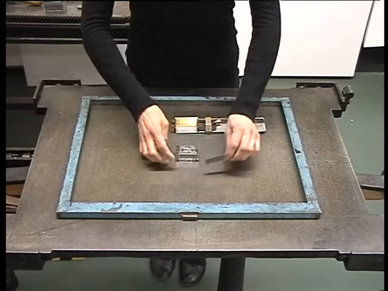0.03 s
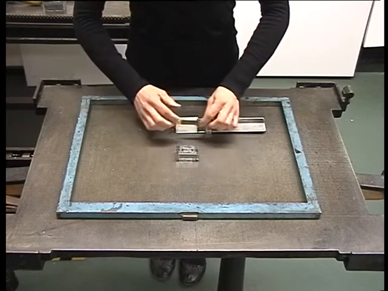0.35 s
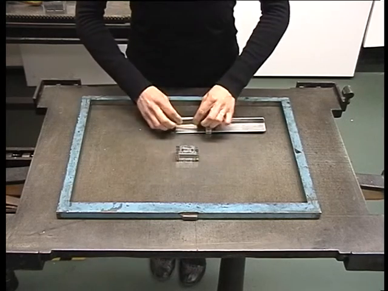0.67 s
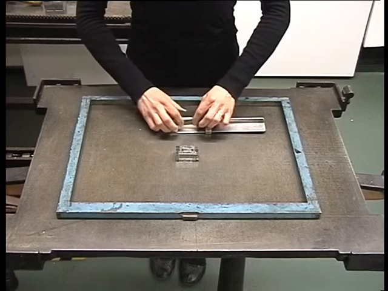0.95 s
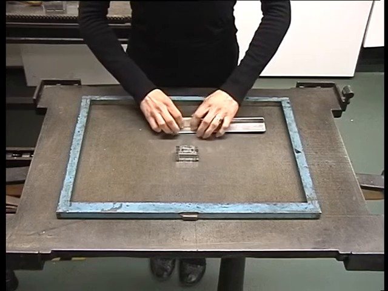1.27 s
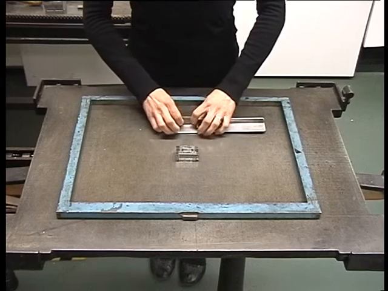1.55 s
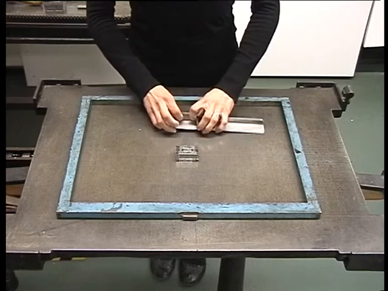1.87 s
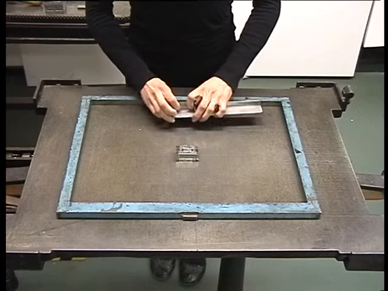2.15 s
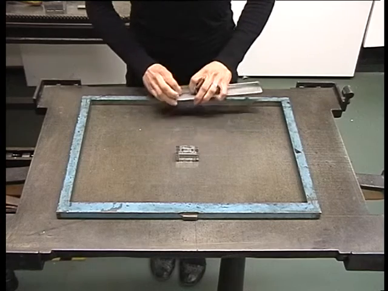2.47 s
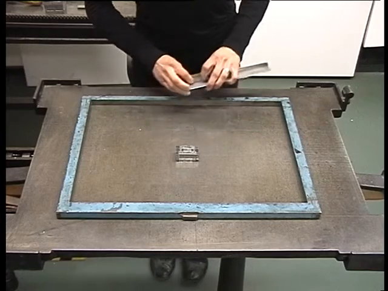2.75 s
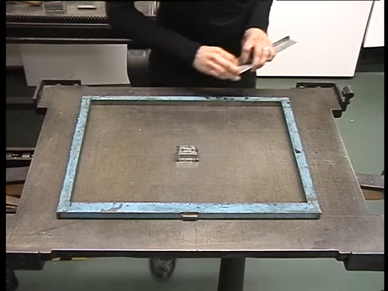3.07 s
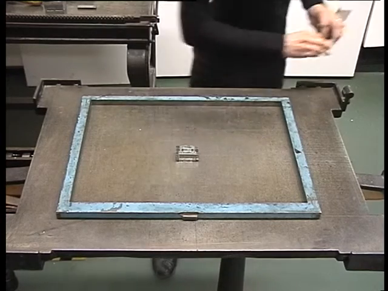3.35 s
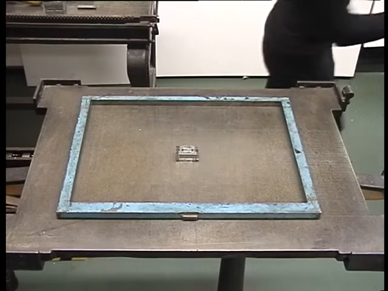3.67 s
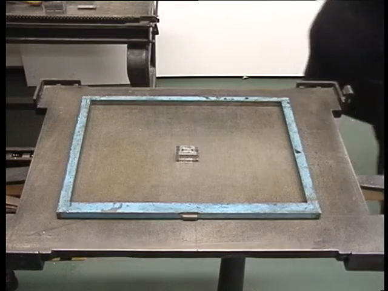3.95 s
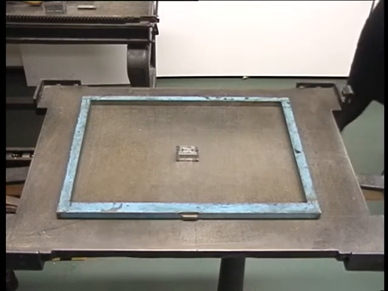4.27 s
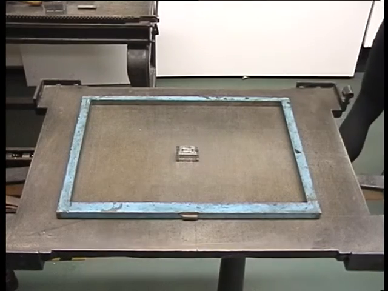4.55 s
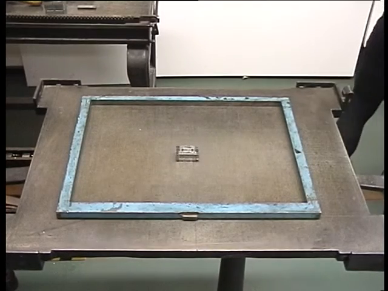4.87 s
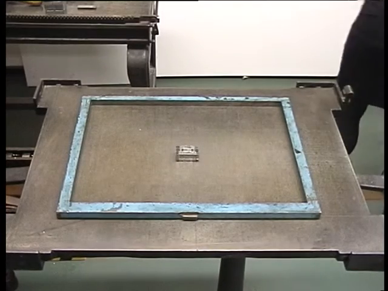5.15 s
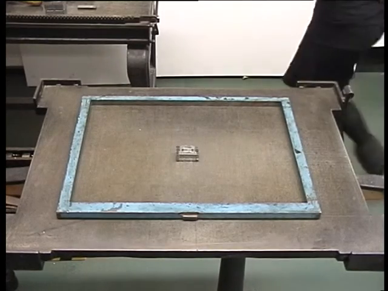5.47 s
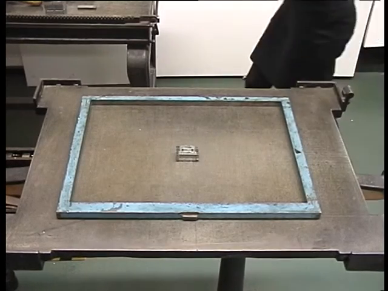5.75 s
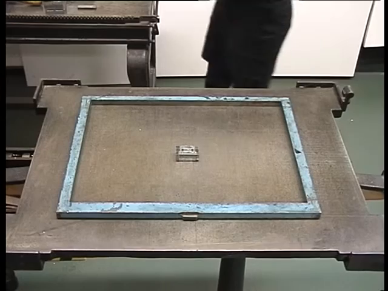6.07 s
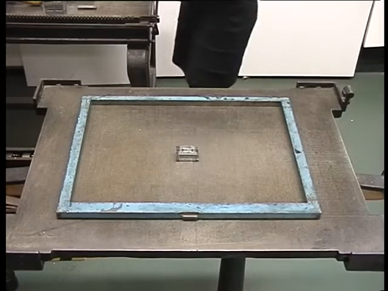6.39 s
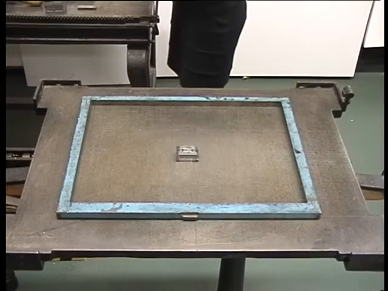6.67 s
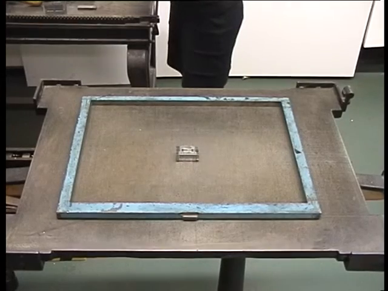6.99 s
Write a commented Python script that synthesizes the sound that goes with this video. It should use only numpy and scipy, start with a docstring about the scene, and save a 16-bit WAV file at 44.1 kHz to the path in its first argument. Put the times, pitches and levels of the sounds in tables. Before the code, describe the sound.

Light metallic ticks sound near the microphone, then a sharp, ringing snap with a low thump and a brief gritty scrape as type seats in its holder. Someone walks away quietly, clothes rustling. A louder cluster comes from the right: a tool clacking down, two wooden knocks, a small bouncing clink. Soft steps come back. The workshop's hard walls add a short echo, with faint hiss and hum throughout.

```python
"""Small, bright ticks of metal type against a steel composing stick, close up in a hard-walled workshop.
The clamp snaps shut with a low thump and the type grates home. The printer walks off, clothes swishing;
to the right a tool clacks down, a wooden case is bumped twice and a small piece drops. The steps
return. Each hit is a burst of micro-impacts ringing a resonant body; air and mains hum lie underneath."""
import sys
import numpy as np
from scipy import signal
from scipy.fft import rfft, irfft, next_fast_len
from scipy.io import wavfile
from scipy.ndimage import uniform_filter1d

SR = 44100
rng = np.random.default_rng(int(sys.argv[2]) if len(sys.argv) > 2 else 0)


def store_wav(level_fs):
    """Save 16-bit WAV to argv[1]."""
    pcm = np.round(np.clip(np.atleast_2d(level_fs), -1, 1) * 32767)
    wavfile.write(sys.argv[1], SR, pcm.T.astype(np.int16))


N = 318709

# Cues. A hit's level is its drive into the body, rattle its decay time, treble its high-shelf gain.
# type ticks on the stick: t/s, level/dB, rattle/s, treble/dB, ring/Hz, overtone/Hz
TICK_HITS = [(0.573, -43.5, 0.004, -2, 2960, 5140), (0.7265, -45, 0.003, -2.5, 3410, 4250),
             (0.82, -63, 0.003, 3, 3430, 5140), (1.021, -51, 0.03, -3, 2980, 3100),
             (1.052, -40, 0.0049, 3.5, 3520, 4250), (1.445, -44, 0.004, 1, 4400, 5100),
             (2.022, -60.5, 0.0053, -0.5, 3000, 4200)]
# single touches: t/s, level/dB, rattle/s, treble/dB
CLAMP_HITS = [(1.0602, -16.5, 0.0015, -0.5)]  # the clamp shuts
TYPE_HITS = [(1.4216, -30, 0.0022, -5), (1.4446, -40, 0.00097, -0.5), (2.17, -60.5, 0.028, 1),
             (2.68, -49.5, 0.016, -15)]  # the type butts home and shifts
TINKLE_HITS = [(5.0015, -35, 0.0094, 0), (5.018, -44, 0.0086, -3)]  # the small piece slides
CLINK_HITS = [(5.0506, -31.5, 0.0034, 2.5), (5.059, -26, 0.0026, 0.5), (5.065, -33, 0.0026, 0.5)]  # it lands and bounces
SHOE_DRAGS = [(3.47, -56, 0.24, 4), (3.925, -68, 0.18, 12), (6.73, -56.5, 0.039, -10)]
# blows that rebound: t/s, level/dB, rattle/s, treble/dB, first gap/s
CARRY_HITS = [(3.185, -45.5, 0.0037, -3, 0.008)]
TOOL_HITS = [(4.2516, -23.5, 0.0041, 1, 0.004)]
CASE_HITS = [(4.5235, -22, 0.006, -0.5, 0.017), (4.651, -26.5, 0.013, 4, 0.013)]
# footsteps: t/s, heel level/dB, sole level/dB, treble/dB
FOOTSTEPS = [(3.25, -58, -57.5, -6.5), (3.83, -55.5, -74, -17), (5.848, -47.5, -56, -2.5),
             (6.41, -56, -71, -21)]
# sub-bass thumps: t/s, level/dB
LOW_THUMPS = [(1.0602, -41), (1.126, -52), (4.252, -54)]
# cloth strokes: peak t/s, level/dB, rise/s, fall/s
STRIDE_SWISHES = [(3.3, -60, .008, 0.015), (3.845, -51, 0.013, 0.046), (3.922, -50.5, 0.047, 0.053),
                  (5.65, -62.5, 0.11, 0.075), (5.99, -64, 0.067, 0.023), (6.08, -61, 0.028, .03),
                  (6.395, -57, 0.01, 0.054)]
LONG_RUSTLE = [(3.7, -67.5, 0.66, 2.2)]

# broad tone of each source: f/Hz, level/dB
TICK_EQ = [(100, -14), (700, -21), (1500, -3.5), (2200, -9.5), (3000, 6.5), (4000, 0), (5500, -6),
           (7200, -10), (9500, -20), (16000, -33)]
STICK_EQ = [(100, -60), (500, -24.5), (1100, -20), (1500, -9), (2350, -12), (3100, 4), (3950, -3),
            (5200, 0.5), (7300, 2), (9500, -5.5), (14000, -6.5), (16000, -13)]
TYPE_EQ = [(100, -38), (500, -10.5), (900, -15), (2000, -3.5), (3200, 2), (7000, 3), (9500, -2.5),
           (12000, -3), (16000, -19)]
CARRY_EQ = [(150, -15), (380, -5), (520, 7.5), (850, -4.5), (1300, 2), (2800, -4.5), (3500, -10),
            (6200, -13), (7300, 0.5), (8400, -10), (10000, -17), (16000, -32)]
TOOL_EQ = [(100, -33), (230, -15.5), (380, -3), (620, -11), (1050, 0.5), (1700, -1.5), (3100, 1), (4900, 2),
           (7500, 1.5), (10000, -5), (12300, -8), (15500, -25)]
CASE_EQ = [(60, -33), (120, -21.5), (200, -12.5), (370, -3.5), (600, -4.5), (830, -8), (1050, -5),
           (2000, -13.5), (3100, -11.5), (5000, -16.5), (8200, -17), (9200, -26), (12000, -29),
           (15500, -49)]
TINKLE_EQ = [(300, -11), (2400, -7.5), (3000, 1), (4000, 3), (8500, -3), (11000, 0), (15000, -6),
             (16000, -18)]
CLINK_EQ = [(100, -27), (270, 1.5), (430, 8), (750, -3.5), (2100, -8), (2900, 5), (3700, 0), (4800, -5),
            (7800, -5), (8900, -2), (11000, -12.5), (15500, -20)]
STEP_EQ = [(70, -36), (170, 0), (290, 6), (450, -1.5), (800, 2), (1280, 2.5), (2000, -3), (3500, -16),
           (8000, -32), (16000, -43)]
CLOTH_EQ = [(150, -16), (900, -0.5), (2000, 0.5), (3500, -0.5), (6000, 1.5), (8000, 0), (11000, -3.5),
            (15500, -6.5)]
AIR_EQ = [(26, -28), (45, -13.5), (96, -6), (139, -3.5), (290, -5.5), (353, -6), (833, -4.5), (1040, -4),
          (1300, -8), (2770, -6.5), (3900, -10.5), (4640, -10.5), (5110, -13.5), (15800, -17.5)]
# resonances of each body: f/Hz, width/Hz, level above its EQ/dB
STICK_RINGS = [(1470, 70, 7), (3050, 120, 2), (3284, 60, 9), (4235, 35, 9), (4317, 30, 19), (5276, 25, 5),
               (6363, 25, 4), (7510, 30, 7), (8549, 30, 6), (11400, 40, 5), (13630, 60, 6)]
TYPE_RINGS = [(1985, 50, 10), (3200, 150, 3)]
WALL_RING = [(2000, 60, 14)]  # the stick's wall, rubbed by slipping type
TOOL_RINGS = [(1120, 60, 5), (2110, 80, 5), (2730, 70, 8), (3550, 110, 1), (5050, 130, 5), (5600, 60, 4),
              (6510, 60, 3), (8400, 60, 4), (10200, 70, 4), (11800, 90, 6)]
CASE_RINGS = [(271, 20, 6), (357, 26, 5), (407, 20, 5), (527, 28, 8), (653, 30, 8), (702, 20, 6),
              (1620, 90, 3)]
TINKLE_RINGS = [(3030, 90, 7.3), (4700, 45, 6), (5370, 46, 13), (7400, 82, 14), (8560, 58, 18)]
CLINK_RINGS = [(2843, 110, 5), (3270, 90, 5)]

# the workshop's reverb time: f/Hz, T60/s
REVERB_TIME = [(100, 0.98), (400, 0.98), (1200, 0.98), (3000, 0.83), (7000, 0.6), (12000, 0.31),
               (16000, 0.24)]
# stereo image: f/Hz, left-right correlation (0 wide, 1 mono)
REVERB_IMAGE = [(100, 0.98), (400, 1), (1000, 0.84), (2000, 0.53), (4000, 0.032), (12000, 0.059)]
AIR_IMAGE = [(50, 0.1), (400, 0.54), (1500, 0.2), (5000, 0.043), (15000, 0.082)]
# mains hum and whine: f/Hz, level before the trim/dB
HUM_PARTIALS = [(49, -72), (150, -72), (300, -73), (600, -77), (1050, -74), (2400, -75.5), (2700, -75.5),
                (3000, -78.5), (3600, -85), (4200, -78), (4500, -72), (4800, -75)]


def clamp_snap():
    """The clamp shuts in one hard, tight hit that rings the steel stick."""
    return body(contacts(CLAMP_HITS, grain_db=1.5), STICK_EQ, STICK_RINGS)


def type_ticks(width_hz=70, ring_db=8, overtone_db=12.5):
    """Each piece of type taps the stick and rings briefly at its own pitch, with one overtone."""
    out = 0
    for *touch, ring_hz, overtone_hz in TICK_HITS:
        rings = [(ring_hz, width_hz, ring_db), (overtone_hz, width_hz, overtone_db)]
        out += body(contacts([touch], grain_db=2.0), TICK_EQ, rings)
    return out


def type_grate(start_s=1.379, gap_s=0.0075, count=5, swell_s=0.018, swell_db=8):
    """Type sticks and slips along the wall at even gaps; the push builds, then holds."""
    full_db, rattle_s, treble_db = -36, 0.012, -4
    ages = gap_s * np.arange(count)
    levels = full_db - swell_db * np.maximum(1 - ages / swell_s, 0)
    slips = [(start_s + age, db, rattle_s, treble_db) for age, db in zip(ages, levels)]
    return body(contacts(slips, grain_db=4.0), TYPE_EQ, TYPE_RINGS + WALL_RING)


def type_seating():
    """The type butts home with a gritty click, then shifts faintly in the stick."""
    return body(contacts(TYPE_HITS, grain_db=5.0), TYPE_EQ, TYPE_RINGS)


def stick_carry():
    """The stick knocks lightly as it is carried off, each rebound brighter."""
    hits = rebounds(CARRY_HITS, gap_ratio=1.1, loss_db=3.5, treble_step_db=5.0)
    return body(contacts(hits, grain_db=2.5), CARRY_EQ)


def tool_clack(settle_after_s=0.0134, settle_db=-18, settle_rattle_s=0.0022, settle_treble_db=-6):
    """A metal tool chatters as it lands, then its weight settles with a duller knock."""
    chatter = rebounds(TOOL_HITS, gap_ratio=0.9, loss_db=0.1, treble_step_db=-1.2)
    settle = (TOOL_HITS[0][0] + settle_after_s, settle_db, settle_rattle_s, settle_treble_db)
    return body(contacts(chatter + [settle], grain_db=2.5), TOOL_EQ, TOOL_RINGS)


def case_bumps(graze_softer_db=11.5, graze_lead=0.8):
    """A wooden case is grazed, bumped and left rocking; the slower the bump, the earlier the graze."""
    grazes = [(s - graze_lead * rattle_s, db - graze_softer_db, rattle_s, treble_db)
              for s, db, rattle_s, treble_db, _ in CASE_HITS]
    rocking = rebounds(CASE_HITS, gap_ratio=1.9, loss_db=0.8, treble_step_db=-12)
    return body(contacts(grazes + rocking, grain_db=4.5), CASE_EQ, CASE_RINGS)


def piece_slide():
    """A small metal piece tinkles as it slides, just before it drops."""
    return body(contacts(TINKLE_HITS, grain_db=1), TINKLE_EQ, TINKLE_RINGS)


def piece_drop():
    """The piece lands and bounces in a quick cluster of clinks."""
    return body(contacts(CLINK_HITS, grain_db=0.5), CLINK_EQ, CLINK_RINGS)


def low_thump(hz=6.4, rise_s=0.00087, decay_s=0.05):
    """A deep, quickly damped sub-bass thump at and just after the snap, and under the clack."""
    t, out = np.arange(N) / SR, 0
    for s, db in LOW_THUMPS:
        age = np.maximum(t - s, 0)
        envelope = (1 - np.exp(-age / rise_s)) * np.exp(-age / decay_s)
        out += from_db(db) * envelope * np.cos(2 * np.pi * hz * age)
    return out


def footsteps(heel_rattle_s=0.005, sole_rattle_s=0.011, sole_after_s=0.046, toe_after_s=0.126):
    """The heel strikes, then a brighter sole and toe slap down; here and there a shoe drags."""
    hits = []
    for s, heel_db, sole_db, treble_db in FOOTSTEPS:
        bright_db = treble_db + 12
        hits += [(s, heel_db, heel_rattle_s, treble_db),
                 (s + sole_after_s, sole_db, sole_rattle_s, bright_db),
                 (s + toe_after_s, sole_db - 1, sole_rattle_s, bright_db)]
    return body(contacts(hits + SHOE_DRAGS, grain_db=5.5), STEP_EQ)


def cloth_swish():
    """Rubbing cloth: countless tiny slips under strokes that swell and die away."""
    t, power = np.arange(N) / SR, 0
    for s, db, rise_s, fall_s in STRIDE_SWISHES + LONG_RUSTLE:
        stroke = np.exp(-np.where(t < s, ((t - s) / rise_s) ** 2, (t - s) / fall_s))
        power += (from_db(db) * stroke) ** 2
    slips = unit_energy(grit(N, grain_db=2.0)) * np.sqrt(N)
    return body(np.sqrt(power) * slips, CLOTH_EQ)


def rebounds(blows, gap_ratio, loss_db, treble_step_db, count=3):
    """A rocking object repeats its blow: gaps scale by a ratio, level and treble move in even steps."""
    hits = []
    for s, db, rattle_s, treble_db, gap_s in blows:
        for k in range(count):
            hits.append((s, db - k * loss_db, rattle_s, treble_db + k * treble_step_db))
            s += gap_s * gap_ratio ** k
    return hits


def contacts(hits, grain_db, shelf_hz=1500, size=16384):
    """The exciter: each contact is a dying rattle of micro-impacts with no pitch of its own."""
    force, t = np.zeros(N + size), np.arange(size) / SR
    for s, db, rattle_s, treble_db in hits:
        burst = whiten(grit(size, grain_db) * np.exp(-t / rattle_s), width_hz=160)
        lows = signal.lfilter(*signal.butter(1, shelf_hz, fs=SR), burst)
        burst = lows + from_db(treble_db) * (burst - lows)  # a harder touch is brighter
        start = int(s * SR)
        force[start:start + size] += from_db(db) * np.sqrt(SR / 100) * burst
    return force[:N]


def body(force, eq, rings=(), size=16384):
    """The resonator: crowded short modes give a broad tone, with clear rings on top."""
    hz = np.arange(size // 2 + 1) * SR / size
    ring_power = np.ones(len(hz))
    for centre, width, db in rings:
        ring_power += (from_db(db) ** 2 - 1) / (1 + (2 * (hz - centre) / width) ** 2)
    magnitude = from_db(at_hz(eq, hz)) * np.sqrt(ring_power)
    cepstrum = irfft(np.log(magnitude))
    cepstrum[1:size // 2] *= 2  # minimum phase: nothing sounds before the blow
    cepstrum[size // 2:] = 0
    impulse = unit_energy(irfft(np.exp(rfft(cepstrum))))
    return signal.oaconvolve(force, impulse)[:N]


def grit(size, grain_db):
    """Noise of uneven micro-impacts; grain_db spreads their levels for a coarser texture."""
    return rng.standard_normal(size) * from_db(grain_db * rng.standard_normal(size))


def whiten(x, width_hz):
    """Level a decaying noise across bands of this width, keeping its fine texture."""
    size, spectrum = x.shape[-1], rfft(x)
    bins = max(int(width_hz * size / SR), 3)
    band_power = uniform_filter1d(np.abs(spectrum) ** 2, bins)
    flat = irfft(spectrum / np.sqrt(np.abs(band_power) + 1e-20))
    first_half = np.arange(size) < size // 2
    return unit_energy(flat * first_half)


def from_db(db):
    """Decibels to gain."""
    return 10 ** (np.asarray(db) / 20)


def at_hz(points, hz):
    """Read a curve on a log-frequency axis."""
    f, value = np.transpose(points)
    return np.interp(np.log(np.maximum(hz, 1)), np.log(f), value)


def unit_energy(x):
    """Scale each channel to a sum of squares of 1."""
    return x / np.sqrt(np.sum(x ** 2, axis=-1, keepdims=True) + 1e-30)


def stereo_noise(image, size):
    """Frequencies and left/right spectra of white noise whose stereo width follows the image curve."""
    mid, side = rfft(rng.standard_normal((2, size)))
    hz = np.arange(len(mid)) * SR / size
    alike = at_hz(image, hz)
    return hz, np.sqrt(1 + alike) * mid + np.sqrt(1 - alike) * side * [[1], [-1]]


def place(sound, room, wet_db, right_db):
    """Pan the direct sound and add its reverb send."""
    pan = np.sqrt(2) * unit_energy(from_db([-right_db / 2, right_db / 2]))
    reverb = signal.fftconvolve(sound[None], room, axes=1)[:, :N]
    return pan[:, None] * sound + from_db(wet_db) * reverb


def workshop_reverb(build_s=0.0021, size=81920):
    """Stereo response of hard walls: reflections build, then die away, the treble first."""
    hz, noise = stereo_noise(REVERB_IMAGE, size)
    t, tail = np.arange(size) / SR, 0
    centres = np.geomspace(100, 16000, 9)
    for centre, band_gains in zip(centres, np.eye(len(centres))):
        band = irfft(noise * at_hz(np.c_[centres, band_gains], hz))
        tail += band * np.exp(-np.log(1000) * t / at_hz(REVERB_TIME, centre))
    diffuse = whiten(tail * (1 - np.exp(-t / build_s)), width_hz=51)
    stored = np.sqrt(at_hz(REVERB_TIME, hz))  # bands that ring longer hold more energy
    return unit_energy(irfft(rfft(diffuse) * stored)[:, :size // 2])


def room_air(level_db=-59):
    """Still air: a wide, steady bed of soft hiss."""
    hz, noise = stereo_noise(AIR_IMAGE, next_fast_len(N, True))
    air = irfft(noise * from_db(at_hz(AIR_EQ, hz)))[:, :N]
    return from_db(level_db) * unit_energy(air) * np.sqrt(N)


def mains_hum(trim_db=-0.24):
    """Steady sines: a low mains hum with a thin whine above it."""
    t = np.arange(N) / SR
    return sum(from_db(db + trim_db) * np.sqrt(2) * np.sin(2 * np.pi * (hz * t + rng.random()))
               for hz, db in HUM_PARTIALS)


def scene():
    """The mix: stick, steps and cloth sit near the centre; tool, case and small piece to the right."""
    room = workshop_reverb()
    out = place(type_ticks(), room, wet_db=-1.0, right_db=0.0)
    out += place(clamp_snap(), room, wet_db=3.5, right_db=0.5)
    out += place(type_grate(), room, wet_db=0.0, right_db=-1.5)
    out += place(type_seating(), room, wet_db=-1.5, right_db=-1.5)
    out += place(stick_carry(), room, wet_db=0.0, right_db=-0.3)
    out += place(tool_clack(), room, wet_db=2.5, right_db=5.5)
    out += place(case_bumps(), room, wet_db=0.5, right_db=2.5)
    out += place(piece_slide(), room, wet_db=6.5, right_db=11)
    out += place(piece_drop(), room, wet_db=0.5, right_db=2.5)
    out += place(footsteps(), room, wet_db=2.0, right_db=-1.0)
    out += place(cloth_swish(), room, wet_db=7.0, right_db=-0.5)
    return out + low_thump() + room_air() + mains_hum()


def record(dry):
    """Master chain: soft clipping rounds the peaks, then a steep low-pass trims the very top."""
    ceiling, cutoff_hz = 0.9, 15900
    rounded = ceiling * np.tanh(dry / ceiling)
    return signal.sosfilt(signal.ellip(10, .1, 80, cutoff_hz, fs=SR, output="sos"), rounded)


dry = scene()
out = record(dry)
store_wav(out)
```